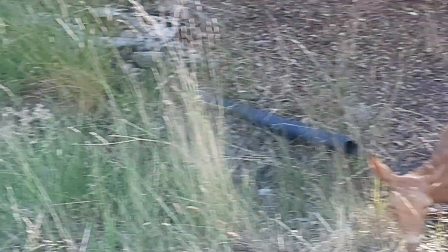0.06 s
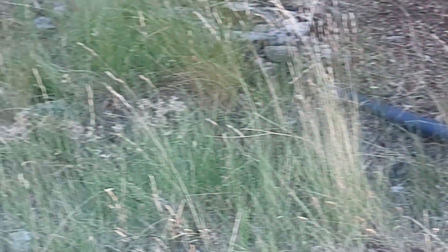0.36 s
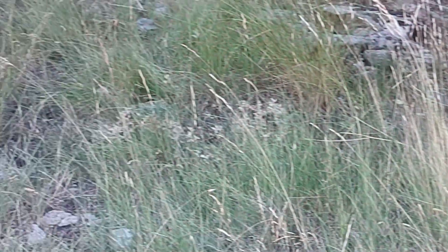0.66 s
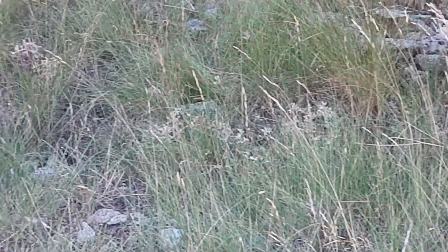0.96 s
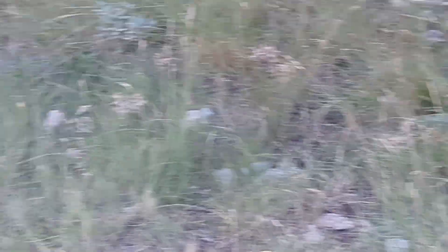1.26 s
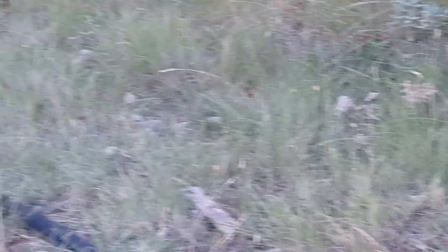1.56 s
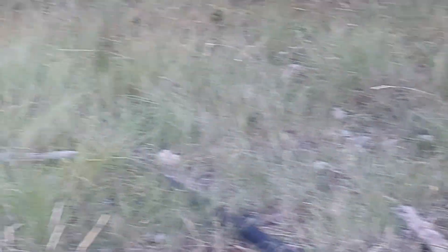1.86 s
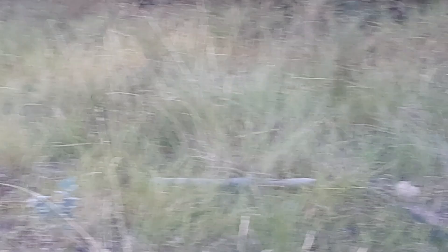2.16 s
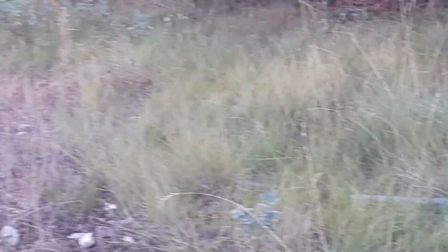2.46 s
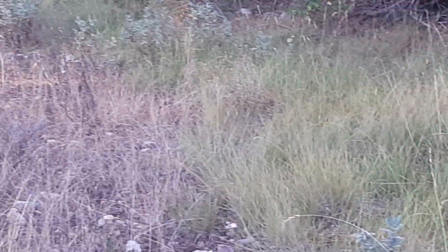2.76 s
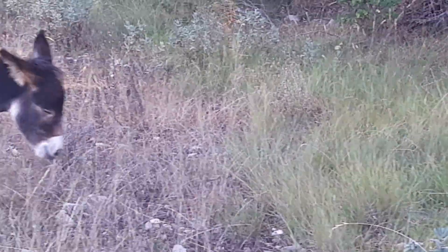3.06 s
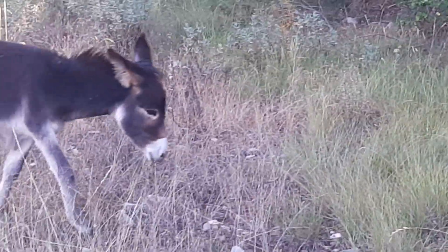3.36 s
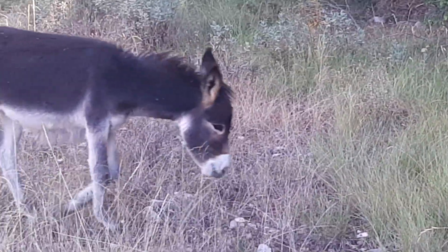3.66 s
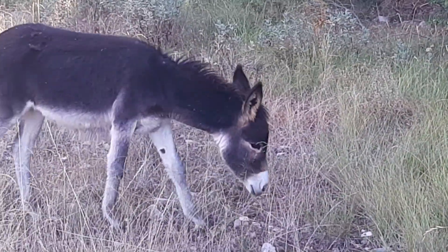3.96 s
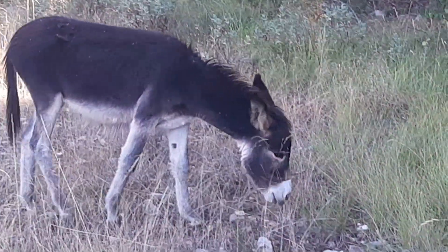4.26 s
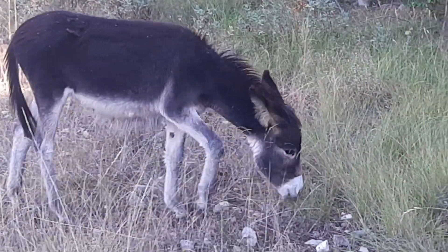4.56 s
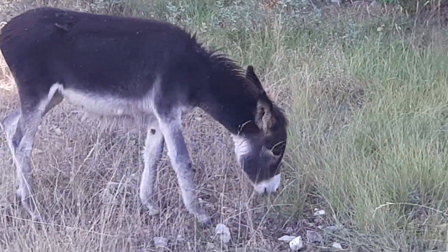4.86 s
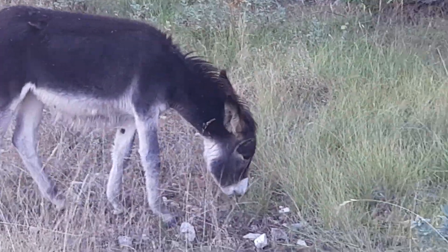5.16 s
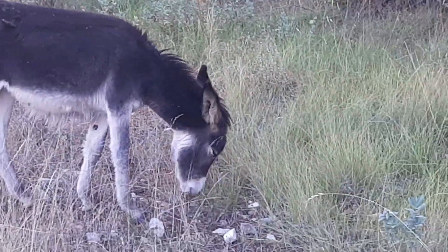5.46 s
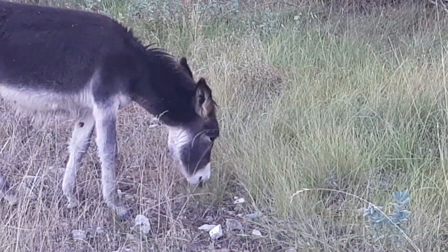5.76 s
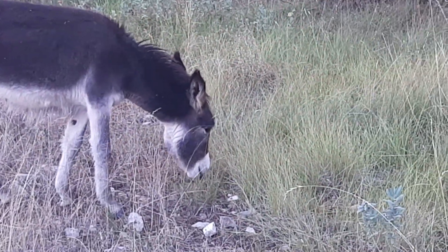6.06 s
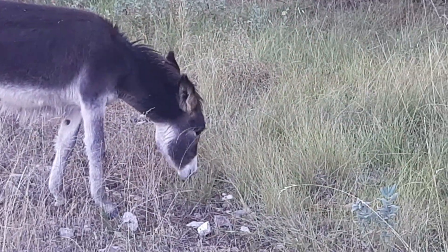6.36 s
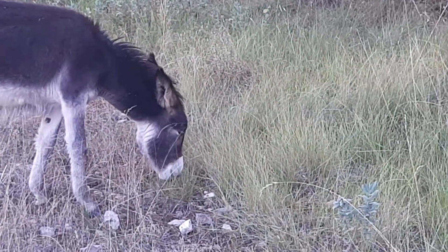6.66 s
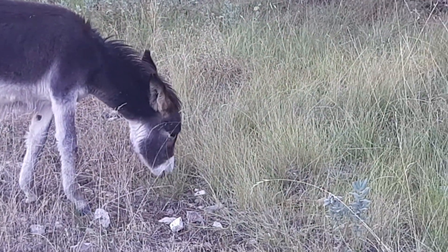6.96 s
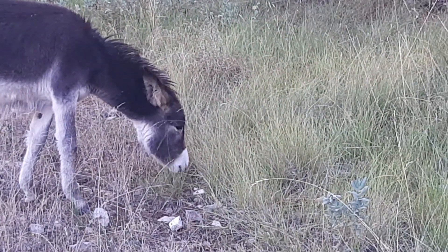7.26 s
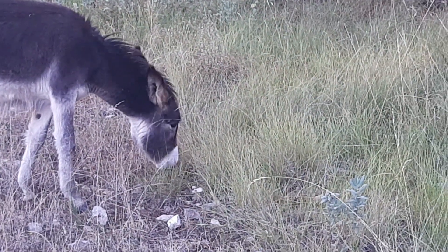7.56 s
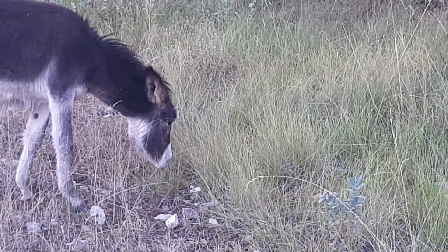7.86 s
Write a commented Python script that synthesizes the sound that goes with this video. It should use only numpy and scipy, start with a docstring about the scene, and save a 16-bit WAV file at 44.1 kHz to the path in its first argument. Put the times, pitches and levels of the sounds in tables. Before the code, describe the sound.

A goat's sheet-metal bell clanks irregularly up close in a quiet field, with dry grass rustling and a few knocks on a metal pipe.

```python
"""A quiet dry field, close to a grazing goat, with nearly all of the sound in the right channel.
Over faint rumble and hiss, steps thud softly and dry grass rustles and snaps. Knocks set a long
metal pipe on the ground ringing and a loose frame clattering. Up front clanks the sheet-metal bell
at the goat's neck: its clapper hits, chatters and scrapes, ringing the shell and choking it again."""
import sys
import numpy as np
from scipy import signal
from scipy.fft import rfft, irfft, next_fast_len
from scipy.io import wavfile
from scipy.ndimage import uniform_filter1d

SR = 44100
rng = np.random.default_rng(int(sys.argv[2]) if len(sys.argv) > 2 else 0)


def log_audio(samples):
    """Write samples as a 16-bit WAV file to the path given in sys.argv[1]."""
    # one column per channel
    frames = np.atleast_2d(samples).T
    # limit to full scale, then quantise
    limited = np.clip(frames, -1, 1)
    pcm = np.round(limited * 32767).astype(np.int16)
    wavfile.write(sys.argv[1], SR, pcm)


N = 349713
T = np.arange(N) / SR
RING = T[:int(.8 * SR)]  # time axis of one ring-out

# Levels in the tables are relative, ahead of the mix gains.
# field ambience on the right: frequency_hz, density_db
AIR_SPECTRUM = [(20, -29.5), (45, 4), (75, -1), (130, -3.5), (250, -11.5), (600, -13.5), (1500, -24.5),
                (4000, -22), (16000, -16.5)]
# steady rumble and hiss on the left: frequency_hz, density_db
LEFT_SPECTRUM = [(20, -19.5), (55, -2), (100, 0.5), (200, -15), (400, -21.5), (1600, -27.5), (16000, -30)]
# soft steps and bumps: start_s, level_db, pitch_hz, decay_s, left_gain_db
STEP_THUDS = [(.13, -52.5, 220, 0.046, -32), (1.15, -38, 135, .005, -38), (3.033, -61.5, 79, 0.018, -7),
              (3.297, -56.5, 104, 0.03, -4), (3.355, -64, 81, 0.01, 2), (4.246, -58, 95, 0.022, 3),
              (5.429, -64.5, 374, 0.045, -31), (7.412, -53, 196, .01, -20), (7.453, -51.5, 177, 0.016, -26)]
# tone of dry grass: frequency_hz, density_db
GRASS_SPECTRUM = [(300, -25.5), (1000, -11), (2500, -12), (4000, 0.5), (6300, 5), (8500, -12.5),
                  (12000, -8), (16000, -17)]
# swells of the rustle: time_s, level_db
RUSTLE_CURVE = [(0, -73), (.7, -72), (1.0, -60.5), (1.3, -74.5), (1.6, -69), (2.45, -72), (2.85, -85),
                (3.13, -75), (3.5, -65.5), (3.8, -74.5), (4.1, -73), (4.45, -77.5), (5.3, -81), (5.62, -99),
                (6.15, -71.5), (6.42, -83), (7.33, -74), (7.93, -80)]
# sharp clicks, dry stalks snapping and one loud knock of the bell: start_s, level_db, decay_s
SHARP_CLICKS = [(0.259, -46.5, 0.016), (0.881, -34.5, 0.0023), (0.887, -29, 0.0059), (0.894, -37, 0.0053),
                (0.936, -38, .002), (0.961, -35, 0.0037), (1.011, -33, 0.00027), (1.148, -19.5, 0.0037),
                (2.597, -34, 0.005), (2.617, -38, 0.0018), (5.344, -44, .011), (5.371, -38, 0.0019),
                (5.385, -48.5, 0.0025), (6.261, -41, 0.0025), (6.273, -38, 0.0012), (7.081, -40.5, 0.0013),
                (7.12, -38, 0.002), (7.172, -42, .001)]
# weight of the pipe's modes: frequency_hz, level_db
PIPE_SPECTRUM = [(100, -20.5), (350, -46.5), (750, -14), (1100, -18), (1400, -8.5), (1700, -3), (2200, 0.5),
                 (2800, -16), (3500, -3.5), (5000, -38), (7000, -9.5), (9000, -34)]
# weight of the frame's modes: frequency_hz, level_db
FRAME_SPECTRUM = [(60, 4), (200, -2), (420, -3), (600, -1.5), (1100, -3.5), (1900, 2.5), (2700, -4.5),
                  (4000, 0.5), (7000, -2.5), (10000, -31)]
# long low tones of the frame: pitch_hz, level_db, t60_s
FRAME_HUM = [(80.1, -14.5, 1), (192, -15, 1.8), (383, -15, 1.2), (410, -14, 1.2)]
# knocks on the pipe and its loose frame: start_s, pipe_db, frame_db, frame_bass_db
PIPE_KNOCKS = [(1.805, -32.5, -40.5, -20), (1.8708, -28.5, -45, -3.5), (2.264, -49.5, -47.5, -12),
               (2.462, -39, -46, -2.5), (3.508, -46, -46.5, -17), (3.582, -50, -44, -5.5),
               (3.864, -45, -42.5, 2), (3.964, -59, -42, 1), (4.175, -49, -47, -12)]
# bell modes, split in pairs by the oval mouth; the shortest is the air inside: pitch_hz, level_db, t60_s
BELL_MODES = [(818, 0, .46), (915, 1, .03), (2066, -8, .55), (2133, -2, .62), (3541, -5, .45),
              (3635, 1, .48), (3974, -7, .12), (4279, -6, .18), (4795, -7, .27), (5188, -3, .28),
              (5254, -4, .23), (5469, -10, .28), (5768, -10, .28), (6102, -7, .2), (7178, -1, .18),
              (7655, -14, .22), (7891, -20, .18), (8410, -19, .18), (9660, -18, .16), (9800, -17, .14),
              (10540, -13, .16), (10650, -14, .14), (11111, -18, .15), (11757, -12, .17), (11938, -11, .17),
              (12625, -14, .14), (12988, -13, .17), (13156, -15, .16), (13662, -14, .13), (15495, -16, .16)]
# borders between the bell's six mode families: frequency_hz
FAMILY_BORDERS_HZ = [1500, 3000, 3850, 6800, 8100]
# how hum, second pair, third pair, main ring, ring near 7 kHz and shimmer answer a blow:
# level_db, depth_share, brightness_share
FAMILY_VOICING = [(3, 1, 0), (-6, .6, 0), (-3, .5, 0), (0, 0, 0), (-5.5, 0, .3), (1, 0, 1)]
# clean clapper blows; nearer the rim wakes the lows, a harder edge the highs, each spot favours a partial:
# start_s, level_db, depth_db, brightness_db, favoured_hz
CLAPPER_BLOWS = [(0.1094, -49.5, -23.5, -1, 5640), (0.319, -50, 3, 6, 3974.0), (0.507, -39, -15, -10, 5170),
                 (0.6167, -44, -9, -11, 3630), (0.7072, -43.5, -12.5, -6, 4795.0),
                 (0.8085, -45.5, -5, 1, 4795.0), (0.8371, -46.5, -9, -24, 3700),
                 (1.045, -38.5, -18, -9, 3550), (1.1315, -29.5, -16.0, -15.0, 4279.0),
                 (1.4455, -23.5, -13.5, -5.5, 2190), (1.5076, -31, -30, -9, 5460),
                 (1.5165, -28.5, -24.5, -10, 5469.0), (1.6001, -39.5, -26, -20.0, 4279.0),
                 (1.7575, -25.5, -22.5, -10.5, 5469.0), (1.8529, -37.5, -18, -13, 2230),
                 (1.8838, -42.0, -19, -27, 5469.0), (1.9705, -46.5, -6.5, -33, 4795.0),
                 (2.073, -39, -19, -4.0, 5768.0), (2.1095, -35, -6.5, -1, 5720),
                 (2.187, -31.5, -15.5, -1.5, 5350), (2.245, -42.5, -37, -4.5, 5469.0),
                 (2.3085, -51, 0, -13.0, 2180), (2.497, -37, -17.0, 7.5, 5469.0),
                 (2.5478, -41.5, -45, 2.0, 4279.0), (2.7605, -52, -23, 5.5, 4795.0),
                 (2.8372, -51.5, -45, 3, 2100.0), (2.9755, -32, -11, -7.5, 3664),
                 (3.131, -40.5, -9, -13, 5469.0), (3.3378, -46.5, -15.5, -18, 2100.0),
                 (3.437, -48.0, -22, 7, 3640), (3.6365, -45.5, -15, -1.5, 2140),
                 (3.9637, -45, -8, 10, 5370), (4.0931, -43.5, -10, -1, 2105),
                 (4.314, -39, -13.5, -13, 3530), (4.6952, -45.0, -8.5, -10.0, 5469.0),
                 (4.914, -46, -28, -8.5, 3974.0), (5.0375, -43.5, -21.5, 6, 5140),
                 (5.124, -41.5, -32, -1.5, 5469.0), (5.2183, -55, -4.5, -20, 5060),
                 (5.2488, -50, -28, 1.0, 5300), (5.6836, -51.5, -7, -28, 3630),
                 (6.043, -41.5, -16.5, -2, 3974.0), (6.1105, -44, -20.5, 5.0, 5250),
                 (6.202, -36.5, -10.0, -7, 7178.0), (6.5125, -43, -14.5, -5.5, 5145),
                 (6.6868, -43.5, -4.5, -14, 5469.0), (6.7225, -46, -12, -4.5, 4795.0),
                 (6.753, -69.5, 15.5, 1, 3974.0), (6.7912, -45, -7.5, -18, 5469.0),
                 (6.998, -52.5, -4, -0.5, 5170), (7.1812, -57.5, -48, 5, 4795.0),
                 (7.2082, -35, -10, -2.5, 4795.0), (7.4921, -51.5, -22, 1, 5768.0),
                 (7.5275, -44, -2.5, 1, 5768.0), (7.6508, -50, 4.5, 3, 5160),
                 (7.6858, -46, -37, -15, 4795.0), (7.806, -55.5, -22, -1, 4795.0),
                 (7.8445, -44, -12, -2, 4795.0)]
# the clapper skids along the wall: start_s, level_db, contact_s, favoured_hz
CLAPPER_SCRAPES = [(0.1629, -57, 0.0025, 3974.0), (0.553, -35.5, 0.0059, 4795.0),
                   (0.566, -34.5, 0.0042, 3974.0), (1.1485, -28, 0.0055, 5220.0),
                   (1.171, -34.5, 0.0017, 3590.0), (1.5521, -40.5, 0.008, 5220.0),
                   (2.1377, -39.5, 0.016, 4279.0), (3.3903, -44.0, 0.0026, 4795.0),
                   (3.868, -36.5, 0.0098, 5768.0), (4.584, -47.5, 0.012, 4795.0),
                   (5.717, -41.5, 0.0038, 2100.0), (7.232, -36, 0.013, 5768.0),
                   (7.8823, -33, 0.0028, 5220.0)]
# tone of the frame's grit, the clapper's clack and the field's echo: frequency_hz, density_db
GRIT_SPECTRUM = [(200, -4), (1500, 1), (3500, -14), (6500, 4), (9000, -10.5), (16000, -17)]
CLACK_SPECTRUM = [(2800, -12), (4200, 2), (6300, 7.5), (8800, -9.5), (12000, -20.5), (16000, -20)]
ECHO_SPECTRUM = [(200, -2.5), (3000, 0), (7000, 0), (16000, -29)]


def undb(db):
    """Decibels to gain."""
    return 10 ** (np.asarray(db) / 20)


def gain_at(hz, spectrum):
    """Gain of an EQ curve at the given frequencies."""
    points, db = np.transpose(spectrum)
    return undb(np.interp(np.log(np.maximum(hz, 1)), np.log(points), db))


def colour(x, spectrum):
    """Shape x with an EQ curve and scale it to rms 1."""
    n = next_fast_len(len(x))
    shaped = irfft(rfft(x, n) * gain_at(np.fft.rfftfreq(n, 1 / SR), spectrum), n)[:len(x)]
    return shaped / np.sqrt(np.mean(shaped ** 2))


def noise(samples, spectrum):
    """Coloured noise at rms 1."""
    return colour(rng.standard_normal(samples), spectrum)


def high_pass(x, hz):
    """Steep low cut."""
    return signal.sosfilt(signal.butter(5, hz, "high", fs=SR, output="sos"), x)


def drift(rate_hz):
    """Smooth random modulation with a spread near 1."""
    hold = int(SR / rate_hz)
    stairs = np.repeat(rng.standard_normal(N // hold + 1), hold)
    return 1.04 * uniform_filter1d(uniform_filter1d(stairs, hold), hold)[:N]


def add(out, start_s, x):
    """Mix x into out from start_s on."""
    i = max(int(start_s * SR), 0)
    out[i:i + len(x)] += x[:max(N - i, 0)]


def modes(hz, t60, phase=0):
    """One decaying sine per row."""
    decay = np.exp(-np.log(1000) * np.outer(1 / t60, RING))
    return np.sin(2 * np.pi * np.outer(hz, RING) + np.reshape(phase, (-1, 1))) * decay


def chatter(contact_s):
    """Force of a rough contact: dense micro-impacts dying away, with an even spectrum and unit energy."""
    t = T[:int(8 * contact_s * SR) + 2]
    spectrum = rfft(rng.standard_normal(len(t)) * np.exp(-t / contact_s))
    force = irfft(spectrum / np.abs(spectrum), len(t)) * np.exp(-t / (4 * contact_s))
    return force / np.sqrt(np.sum(force ** 2))


def ambience(left_db=-70, right_db=-64):
    """A stereo bed of rumble and hiss, steady on the left and gently swelling on the right."""
    right = undb(right_db + 2 * drift(3)) * noise(N, AIR_SPECTRUM)
    left = undb(left_db) * noise(N, LEFT_SPECTRUM)
    return np.array([left, right])


def field_echo(x, wet_db=-27, t60=1.0):
    """Bushes and stones scatter a faint tail behind the sound."""
    tail = noise(len(RING), ECHO_SPECTRUM)
    tail *= np.exp(-np.log(1000) * RING / t60) * (1 - np.exp(-RING / .0053))
    return x + undb(wet_db) * signal.fftconvolve(x, tail / np.linalg.norm(tail))[:N]


def steps(attack_s=.00056):
    """Dull thuds on dry soil and soft bumps, each with its own stereo position."""
    left, right = np.zeros((2, N))
    for start_s, db, hz, decay_s, left_db in STEP_THUDS:
        soil = noise(len(RING), [(hz / 4, -14), (hz, 0), (hz * 2, -12), (hz * 6, -26), (hz * 30, -60)])
        thud = undb(db) * soil * np.exp(-RING / decay_s) * (1 - np.exp(-RING / attack_s))
        add(left, start_s, undb(left_db) * thud)
        add(right, start_s, thud)
    return np.array([left, right])


def grass(rustle_db=13, grain_db=3.5, flicker_db=5, ticks_per_s=4, tick_db=25, tick_s=.0012):
    """Dry blades crackle into a rustle; sharp clicks are snapping stalks and one knock of the bell."""
    grains = undb(grain_db * np.minimum(rng.exponential(size=N // 32 + 1), 6))
    rustle = colour(np.repeat(grains, 32)[:N] * rng.standard_normal(N), GRASS_SPECTRUM)
    swell_db = lambda s: np.interp(s, *np.transpose(RUSTLE_CURVE))
    out = rustle * undb(swell_db(T) + rustle_db + flicker_db * drift(40))
    # lesser snaps fall at random and ride the rustle's level, give or take 4 dB
    draws = rng.uniform([0, -4], [T[-1], 4], (int(ticks_per_s * T[-1]), 2))
    ticks = [(s, swell_db(s) + tick_db + offset_db, tick_s) for s, offset_db in draws]
    t = T[:2048]
    for start_s, db, decay_s in SHARP_CLICKS + ticks:
        add(out, start_s, undb(db) * np.exp(-t / decay_s) * noise(len(t), GRASS_SPECTRUM))
    return out


def pipe_and_frame(pipe_t60=.34, frame_t60=.42, bass_t60=1.0, rattle_s=.015, grit_s=.085, count=220):
    """Bending waves run the pipe, treble first, and flutter back; the frame rattles and grinds on grit."""
    order = np.arange(5, 58) + .5
    pipe_hz = 3.148 * order ** 2 / (1 + (order / 134) ** 2)
    pipe_rings = modes(pipe_hz, pipe_t60 / np.hypot(.8, pipe_hz / 3500), phase=-np.pi * .3 * order)
    frame_hz = 90 + 9000 * ((np.arange(count) + rng.random(count)) / count) ** 1.7
    bass_share = 1 / (1 + (frame_hz / 600) ** 4)
    treble_t60 = frame_t60 / np.hypot(.7, frame_hz / 4000)
    frame_rings = modes(frame_hz, bass_share * bass_t60 + (1 - bass_share) * treble_t60)
    hum_hz, hum_db, hum_t60 = np.transpose(FRAME_HUM)
    hum = undb(hum_db - 9) @ modes(hum_hz, hum_t60)
    out = np.zeros(N)
    for start_s, pipe_db, frame_db, bass_db in PIPE_KNOCKS:
        pipe_mix = gain_at(pipe_hz, PIPE_SPECTRUM) * undb(2 * rng.standard_normal(len(pipe_hz)))
        add(out, start_s, undb(pipe_db + 1.5) * pipe_mix / np.linalg.norm(pipe_mix) @ pipe_rings)
        frame_mix = gain_at(frame_hz, FRAME_SPECTRUM) * rng.standard_normal(count)
        frame_mix *= undb(bass_share * (bass_db - 6.5)) / np.linalg.norm(frame_mix)
        clatter = frame_mix @ frame_rings + undb(bass_db) * hum
        add(out, start_s, undb(frame_db + 7) * signal.fftconvolve(clatter, chatter(rattle_s)))
        grit = colour(rng.standard_normal(len(RING)) ** 5, GRIT_SPECTRUM)
        add(out, start_s, undb(frame_db - 7) * grit * np.exp(-RING / grit_s))
    return out


def sway(x, direct_sway_s=.00005, ground_db=-13, ground_s=.0031, ground_sway_s=.00016):
    """The bell sways: its pitch wavers a little and the ground echo slides through its partials."""
    motion = drift(5.5)
    direct = np.interp(T - direct_sway_s * motion, T, x)
    bounce = np.interp(T - ground_s - ground_sway_s * motion, T, x)
    return direct + undb(ground_db) * bounce


def clapper_contacts(blow_s=.00055, scrape_depth_db=-26, scrape_bright_db=4.5, sustain_db_per_s=12):
    """A harder contact leaves the clapper pressed on the wall, choking the ring; a skid keeps feeding it."""
    choke = lambda db: 2.5 * (db + 31.5)  # extra fade in dB per second
    blows = [(s, db, depth_db, bright_db, hz, choke(db), blow_s)
             for s, db, depth_db, bright_db, hz in CLAPPER_BLOWS]
    scrapes = [(s, db, scrape_depth_db, scrape_bright_db, hz, choke(db) - sustain_db_per_s, contact_s)
               for s, db, contact_s, hz in CLAPPER_SCRAPES]
    return blows + scrapes


def touches_since(start_s, contacts):
    """Smoothed running count of the later contacts that a ring meets."""
    delays = np.sort([s - start_s for s, *_ in contacts if s > start_s])
    return uniform_filter1d(np.searchsorted(delays, RING).astype(float), size=256)


def goat_bell(favour_db=10, clack_db=-8, clack_s=.023, ring_fade_s=1.0, touch_db=1.0, count=60):
    """Each contact rings the shell's modes and a shimmer of weak high ones, with a short clapper clack."""
    shimmer_hz = np.linspace(8200, 15900, count) + rng.uniform(-70, 70, count)
    shimmer_db = -18 + 3 * rng.standard_normal(count)
    hz, mode_db, t60 = np.vstack([BELL_MODES, np.c_[shimmer_hz, shimmer_db, np.full(count, .05)]]).T
    rings = modes(hz, t60, phase=np.pi * np.arange(len(hz)))
    family = np.searchsorted(FAMILY_BORDERS_HZ, hz)
    upper = hz > FAMILY_BORDERS_HZ[1]
    low_rings, high_rings = rings[~upper], rings[upper]
    clack = noise(N + len(RING), CLACK_SPECTRUM)
    contacts = clapper_contacts()
    # short waves on the shell depend most on the exact point of contact
    scatter_db = 1.8 * np.sqrt(hz / 5000) * rng.standard_normal((len(contacts), len(hz)))
    clonk, clink = np.zeros((2, N))
    for contact, spot_db in zip(contacts, scatter_db):
        start_s, level_db, depth_db, bright_db, favoured_hz, choke_db_per_s, contact_s = contact
        voicing_db = np.dot(FAMILY_VOICING, [1, depth_db, bright_db])[family]
        voicing_db += favour_db * np.exp(-((hz - favoured_hz) / 110) ** 2)
        gains = undb(mode_db + voicing_db + spot_db)
        force = undb(level_db) * chatter(contact_s)
        choke_db = choke_db_per_s * RING
        low = gains[~upper] @ low_rings * undb(-.6 * choke_db)
        # the high ring holds, then fades ever faster; each later contact damps it again
        damping = undb(-choke_db - touch_db * touches_since(start_s, contacts))
        high = gains[upper] @ high_rings * damping * np.exp(-(RING / ring_fade_s) ** 2)
        high += undb(clack_db) * np.exp(-RING / clack_s) * clack[int(start_s * SR):][:len(RING)]
        add(clonk, start_s, signal.fftconvolve(low, force))
        add(clink, start_s, signal.fftconvolve(high, force))
    # each group of modes radiates almost nothing below its own pitch
    return high_pass(clonk, 477) + high_pass(clink, 1680)


def scene(close_db=6, left_bleed_db=-53):
    """Bell, pipe, frame and grass sit hard right, over the steps and the ambience."""
    close = field_echo(sway(goat_bell()) + pipe_and_frame() + grass())
    panned = np.array([undb(left_bleed_db) * close, close])
    return undb(close_db) * (panned + steps()) + ambience()


def record(dry):
    """A steep high cut at 16 kHz on the whole mix."""
    return signal.sosfilt(signal.ellip(10, .2, 80, 16000, fs=SR, output="sos"), dry)


dry = scene()
out = record(dry)
log_audio(out)
```